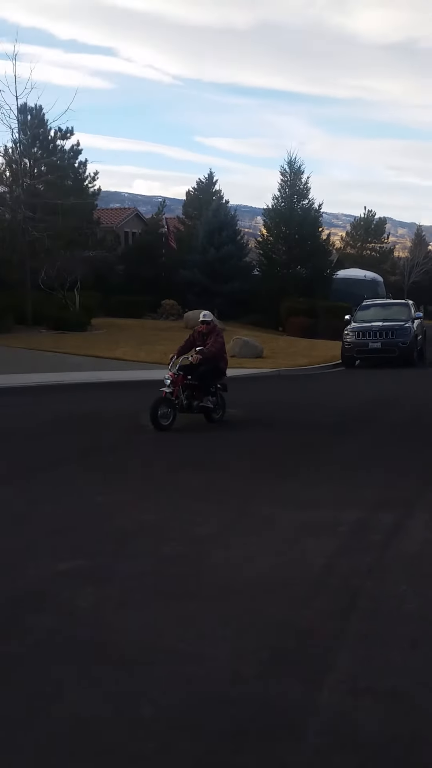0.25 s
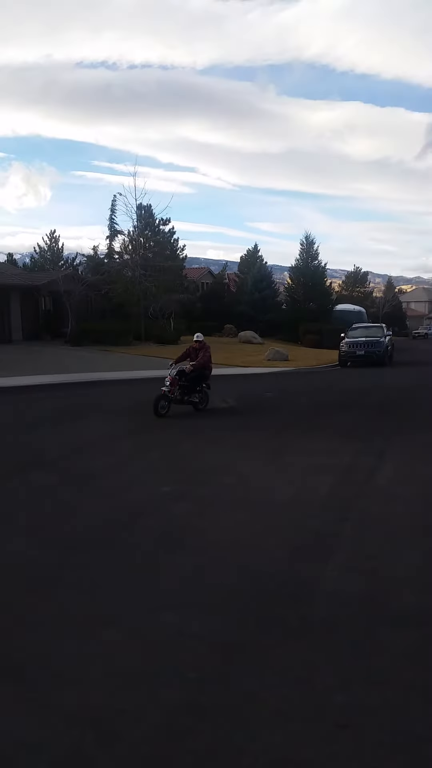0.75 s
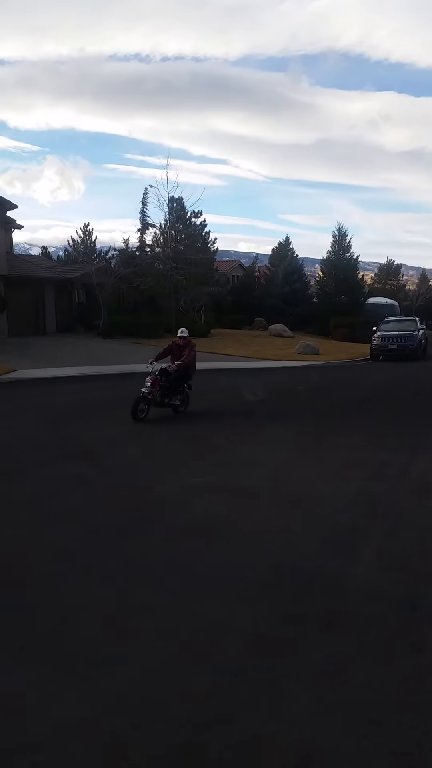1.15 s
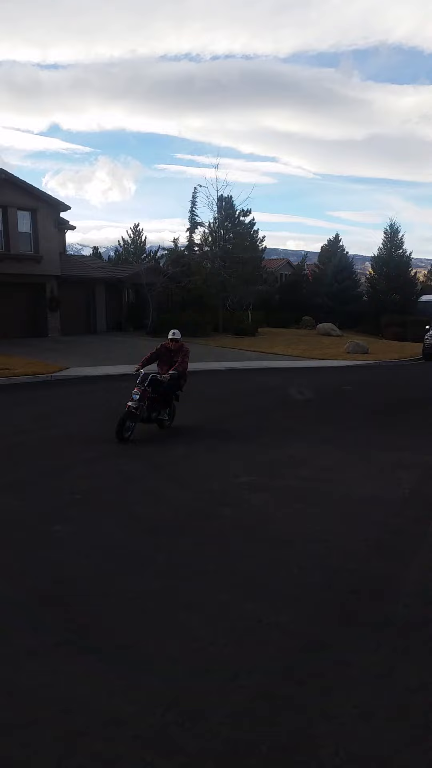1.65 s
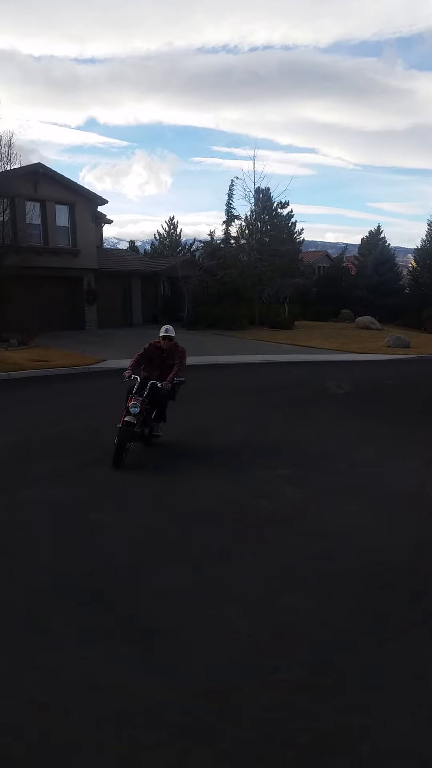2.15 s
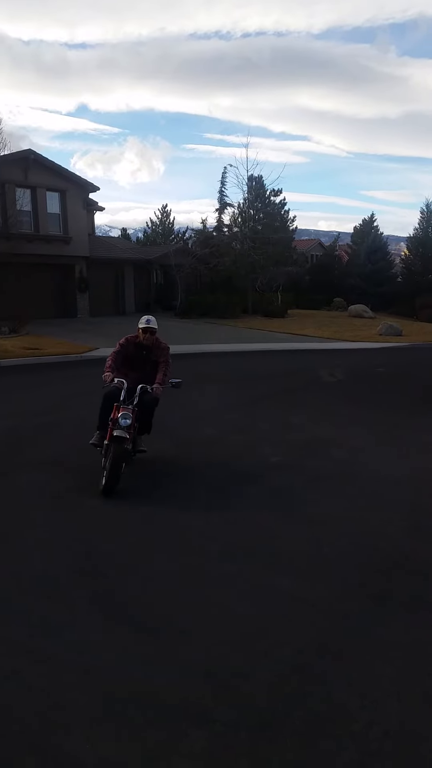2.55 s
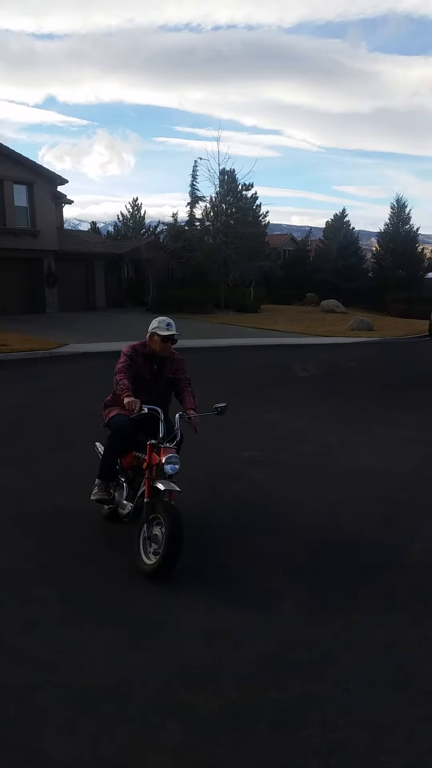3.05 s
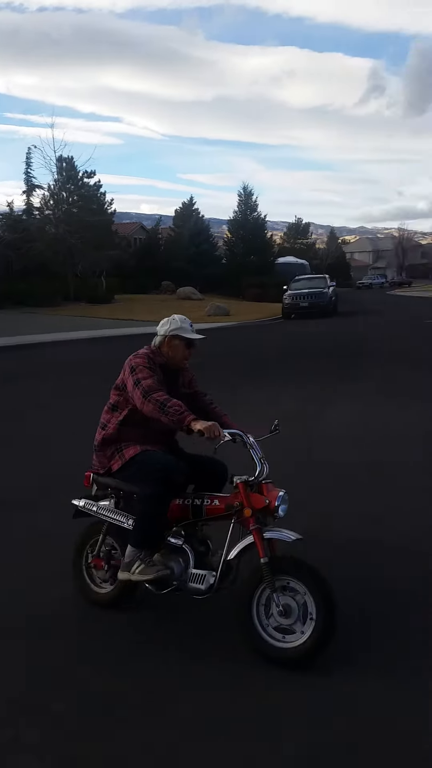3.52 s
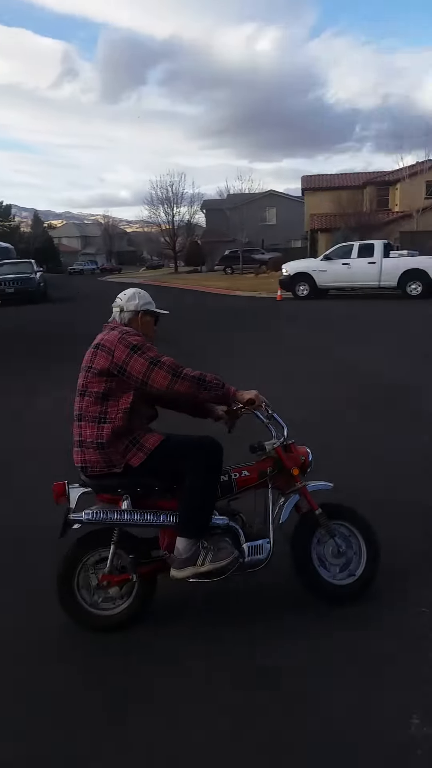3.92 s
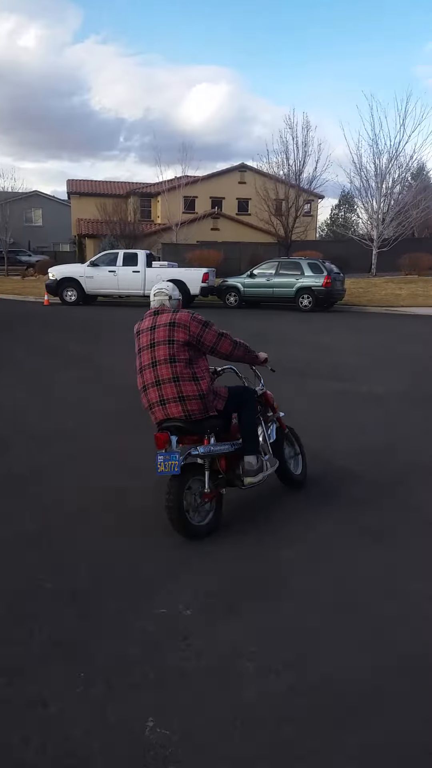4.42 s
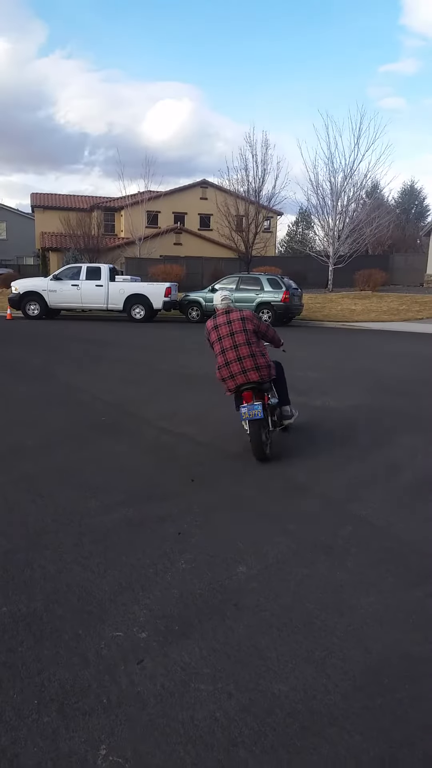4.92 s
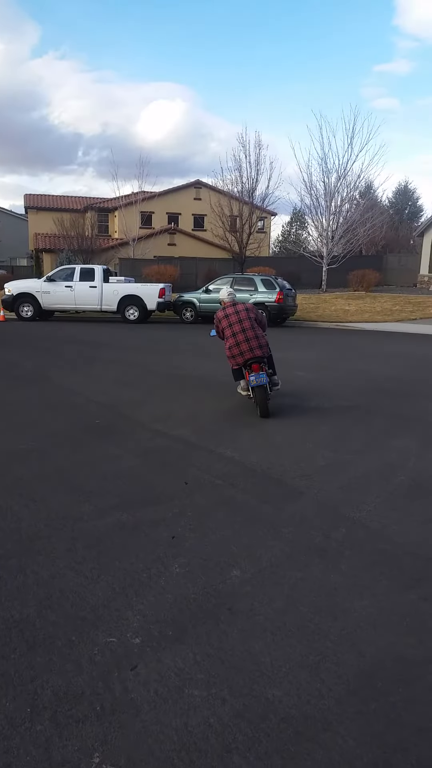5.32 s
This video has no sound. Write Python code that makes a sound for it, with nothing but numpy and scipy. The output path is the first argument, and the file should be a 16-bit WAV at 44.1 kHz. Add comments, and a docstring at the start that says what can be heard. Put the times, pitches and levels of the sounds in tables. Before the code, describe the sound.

A small four-stroke bike putters steadily at about twenty-five firings a second, nearly buried in wind blows at first. It grows with intake honk, valve clatter and gear whine, passes close, briefly eases off, then leaves raspier and slightly higher. The wind hits the left side hardest; the bike is duller on the right, with faint house echoes.

```python
"""Gusts flutter, slap and crack at both microphone ports; a four-stroke minibike putters through them.
On a quiet street the single-cylinder bike rounds a bend, passes close to the microphone and rides away.
Clicks from one crank ring the cavities of exhaust and intake and the casing; gears whine as a band of noise.
Coming, intake, gears and valves stand out; going, the silencer points back and spits with every firing.
The wind is coloured noise under gust envelopes, and the bike sounds muffled at the right port."""
import sys
import numpy as np
from scipy import signal
from scipy.fft import rfft, irfft, next_fast_len
from scipy.io import wavfile
from scipy.ndimage import uniform_filter1d, map_coordinates

SR = 44100
rng = np.random.default_rng(int(sys.argv[2]) if len(sys.argv) > 2 else 0)


def unload_audio(sound):
    """Save the sound as a 16-bit wav file, at the path given as the first command line argument."""
    columns = np.transpose(np.atleast_2d(sound))
    # keep every value between -1 and 1, then stretch to whole-number steps
    steps = np.round(np.clip(columns, -1, 1) * 32767)
    wavfile.write(sys.argv[1], SR, steps.astype(np.int16))


N = 245975   # samples


def from_db(db):
    """Decibels to gain."""
    return 10 ** (np.asarray(db) / 20)


def rms_one(x):
    """Scale to rms 1."""
    return x / np.sqrt(np.mean(x ** 2) + 1e-20)


def evened(x):
    """Hold each channel near rms 1 over a tenth of a second; quicker lumps stay."""
    return x / np.sqrt(uniform_filter1d(x ** 2, SR // 10, axis=1) + 1e-12)


def in_time(rows):
    """Each column of a curve table, at every sample."""
    s, *columns = np.transpose(rows)
    return [np.interp(np.arange(N) / SR, s, column) for column in columns]


def coloured(x, points):
    """Filter by a spectrum table, straight lines in dB over log frequency."""
    size = next_fast_len(N + 4096)
    hz, db = np.transpose(points)
    grid = np.maximum(np.fft.rfftfreq(size, 1 / SR), 1)
    gain = from_db(np.interp(np.log(grid), np.log(hz), db))
    return irfft(rfft(x, size) * gain, size)[..., :N]


def low_pass(x, hz, order=2):
    """Butterworth low-pass."""
    return signal.sosfilt(signal.butter(order, min(hz, .45 * SR), fs=SR, output="sos"), x + 1e-18)


def drift(per_s):
    """Smooth chance of spread 1, with a new random value per_s times a second."""
    steps = np.arange(N) / SR * per_s
    return rms_one(map_coordinates(rng.standard_normal(16384), [steps], order=2, mode="wrap"))


def port_noise(alike):
    """White noise at the two ports, partly shared."""
    shared, alike = rng.standard_normal(N), np.clip(alike, 0, 1)
    return np.sqrt(alike) * shared + np.sqrt(1 - alike) * rng.standard_normal((2, N))


def resonate(x, modes, order=1):
    """Parallel resonances of alternating sign; order 2 steepens their skirts."""
    out = 0
    for k, (hz, width_hz, db) in enumerate(modes):
        radius = np.exp(-np.pi * width_hz / SR)
        feed = np.array([1, 0, -1]) * (1 - radius * radius) / 2
        back = [1, -2 * radius * np.cos(2 * np.pi * hz / SR), radius * radius]
        ring = x + 1e-18
        for _ in range(order):
            ring = signal.lfilter(feed, back, ring)
        out = out + (-1) ** k * from_db(db) * ring
    return out


def strokes(cycle, share, spread_db, delay_s=0, jitter_s=0):
    """One click, uneven in strength and timing, whenever the engine passes this share of its cycle."""
    at = np.flatnonzero(np.diff(np.floor(cycle - share)))
    force, slip = np.clip(rng.standard_normal((256, 2)), -1.8, 1.8)[:len(at)].T
    shifted = at + ((delay_s + jitter_s * slip) * SR).astype(int)
    clicks = np.zeros(N)
    clicks[np.clip(shifted, 0, N - 1)] = from_db(spread_db * force)
    return clicks


def puffs(clicks, rise_s, decay_s):
    """Every click becomes an envelope that swells to a peak as high as the click and dies away."""
    t = np.arange(SR // 10) / SR
    shape = (1 - np.exp(-(t / rise_s) ** 2)) * np.exp(-t / decay_s)
    return signal.fftconvolve(clicks, shape / shape.max())[:N]


def thump(clicks, modes):
    """Pressure pulses ring a cavity for a few swings; a unit pulse peaks at 1."""
    unit = resonate(signal.unit_impulse(SR // 10), modes, order=2)
    return resonate(clicks, modes, order=2) / np.abs(unit).max()


# Light air between the gusts, with one lull. Each row: time in seconds, relative rumble level in dB.
BREEZE = [(0, -24.5), (.75, -28), (.95, -32), (1.15, -43), (1.4, -26), (2.35, -31.5), (2.62, -24.5),
          (4.5, -28), (5.58, -27.5)]
BREEZE_RIGHT_DB, BREEZE_FLUTTER_DB = -1.5, -10   # against the left port's rumble
BREEZE_SWING_DB, BREEZE_SWINGS_PER_S = 3, 15
# Gusts over the microphone. Each row: time of the height in seconds, length in seconds, then relative
# levels in dB of left rumble, right rumble and left flutter.
GUSTS = [(0.142, 0.13, -14.5, -57, -20.5), (0.26, 0.1, -17, -17, -26), (0.478, 0.14, -18.5, -15, -16.5),
         (0.707, 0.054, -22, -32.5, -26.5), (0.861, 0.026, -25, -44, -23.5), (1.325, 0.18, -43, -22, -40),
         (1.537, 0.17, -27.5, -26.5, -15), (2.19, 0.057, -27, -30, -41), (2.607, 0.12, -17, -15.5, -31.5),
         (2.72, 0.034, -14.5, -16, -19.5), (2.766, 0.026, -19, -21, -13.5), (3.316, 0.059, -12, -29, -18.5),
         (3.517, 0.13, -16.5, -12.5, -21), (3.773, 0.081, -25, -12, -23.5), (4.015, 0.016, -12, -39, -25),
         (4.049, 0.025, -24, -34, -13.5), (4.17, 0.052, -16, -28, -15), (4.276, 0.045, -16.5, -41, -9),
         (4.618, 0.11, -37, -49, -15), (4.856, 0.17, -17, -47, -17), (5.058, 0.067, -20, -18.5, -21.5),
         (5.546, 0.37, -22.5, -21, -48)]
GUST_EDGE_DB = 3   # a gust is this far below its height at half its length either side


def airflow():
    """Left rumble, right rumble and left flutter in dB: bell-shaped gusts add their power to a wavering breeze."""
    t, (breeze_db,) = np.arange(N) / SR, in_time(BREEZE)
    left_db, right_db = (breeze_db + BREEZE_SWING_DB * drift(BREEZE_SWINGS_PER_S) for _ in range(2))
    power = from_db([left_db, right_db + BREEZE_RIGHT_DB, left_db + BREEZE_FLUTTER_DB]) ** 2
    for s, length_s, *height_db in GUSTS:
        near = np.abs(t - s) < 2 * length_s
        swell = from_db(-GUST_EDGE_DB * (2 * (t[near] - s) / length_s) ** 2)
        power[:, near] += np.outer(from_db(height_db), swell) ** 2
    return 10 * np.log10(power)


# Wind spectra at a port; flutter also colours the buffets. Each row: frequency in Hz, relative level in dB.
RUMBLE = [(12, -22.5), (28, -2), (55, 5.5), (110, 7.5), (180, 2), (260, -5), (400, -16), (900, -84.5)]
FLUTTER = [(130, -15), (290, 9.5), (450, 3), (700, -4.5), (1000, -17.5), (1600, -31), (3000, -84)]
CRACKLE = [(400, 10), (1200, 4.5), (2500, -14.5), (4500, -32), (6500, -33), (9000, -47)]


def wind(left_db, right_db, flutter_db):
    """Lumpy rumble, separate at each port; harder flow breaks into flutter, the hardest into crackle."""
    rumble = evened(coloured(rng.standard_normal((2, N)), RUMBLE))
    lumps_db = 5.66 * np.array([drift(160) for _ in range(2)])
    eddies = rng.standard_normal((2, N)) * from_db(lumps_db)
    flutter, crackle = evened(coloured(eddies, FLUTTER)), evened(coloured(eddies, CRACKLE))
    rumble_db = np.array([left_db, right_db])
    both_db = np.array([flutter_db, 1.115 * right_db - 10.5])   # the right flutter follows its rumble
    crackle_db = both_db - 32.0 + np.minimum(both_db - rumble_db, 8)
    return rumble * from_db(rumble_db + 4.0) + flutter * from_db(both_db - 3.0) + crackle * from_db(crackle_db)


# Eddies that slap the ports. Each row: time in seconds (the swing crosses zero 4 ms later), relative
# level in dB over both ports, left minus right in dB, half swing in seconds.
BUFFETS = [(0.088, -7.5, 29, 0.00047), (0.281, 0.5, 34, 0.00073), (0.383, -0.5, 22, 0.0013),
           (0.484, -1.5, 34, 0.00085), (0.538, -2, 33, 0.0016), (0.642, -3, 16.5, 0.0017),
           (0.856, -16.5, 39, 0.0004), (1.152, -9, -21, 0.00134), (1.853, -11.5, 10, 0.0023),
           (2.158, -13, 21, 0.0016), (2.646, -6, 19, 0.001), (2.747, -8.5, 35, 0.00063),
           (2.773, -5.5, 34, 0.0011), (4.137, -6, 30, 0.00031), (4.235, -2.5, 30, 0.0014),
           (4.414, -3, 38, 0.00055), (4.797, -7, 43.5, 0.00025), (4.846, -1.5, 42, 0.00024),]


def buffets():
    """An eddy slaps a port: one big pressure swing and a short shudder."""
    out, t = np.zeros((2, N)), np.arange(-SR // 100, SR // 10) / SR
    age = np.maximum(t, 0)
    shape = (1 - np.exp(-(age / 0.0012) ** 2)) * np.exp(-age / 0.01)
    shudder = rms_one(coloured(rng.standard_normal(N), FLUTTER))
    for s, db, pan_db, swing_s in BUFFETS:
        start = int((s + t[0]) * SR)
        span, phase = slice(start, start + len(t)), (t - .004) / swing_s
        swing = phase * np.exp((1 - phase ** 2) / 2)
        burst = swing + 0.4 * shape * shudder[span]
        sides = from_db([[pan_db / 2], [-pan_db / 2]])
        out[:, span] += sides / np.linalg.norm(sides) * from_db(db) * burst
    return out


# The flow tears at the left port with a crack. Each row: time of the height in seconds,
# relative level in dB there, half length in seconds.
CRACKS = [(0.292, -27, 0.0046), (0.391, -27, 0.0045), (0.4927, -15, 0.00069), (0.4979, 1.5, 0.00082),
          (0.506, -19, 0.0012), (0.5092, -11, .0008), (0.5113, -13.5, 0.0015), (.525, -7.5, 0.0014),
          (0.5428, -16, 0.0013), (0.547, -18, 0.0027), (0.552, -24.5, 0.0012), (0.646, -24, 0.003),
          (1.487, -12, 0.0025), (1.497, -9.5, 0.0014), (1.5053, -14.5, 0.0021), (1.519, -16, 0.0023),
          (1.543, -26, 0.013), (1.597, -23, 0.016), (4.183, -15, 0.0025), (4.266, -12, .004),
          (4.32, -21, 0.0027), (4.847, -12.5, 0.0052)]
# Spectrum of the tearing air. Each row: frequency in Hz, relative level in dB.
CRACK_TONE = [(200, -6), (500, 7.5), (1200, 2.5), (2500, -12), (4500, -26.5), (6500, -25.5), (8200, -49),
              (15000, -56)]
CRACK_TAIL_DB, CRACK_TAIL_S = -16, 0.0064
# Treble limit: this many cycles per half length but never below the floor, so the shortest are brightest.
CRACK_DULLEST_HZ, CRACK_CYCLES = 1400, 5.1
GRAINS_PER_S = 1500   # fast air breaks into eddies, here and in the exhaust


def cracks():
    """The hardest eddies tear in clusters of short bursts with quick tails, almost all at the left port."""
    out, t = np.zeros(N), np.arange(N) / SR
    crackle = coloured(rng.standard_normal(N) * from_db(5.9 * drift(GRAINS_PER_S)), CRACK_TONE)
    for s, db, half_s in CRACKS:
        near = np.abs(t - s) < .03
        age = t[near] - s
        tail = (age > 0) * from_db(CRACK_TAIL_DB) * np.exp(-np.abs(age) / CRACK_TAIL_S)
        shape = np.maximum(np.exp(-(age / half_s) ** 2), tail)
        burst = low_pass(shape * crackle[near], max(CRACK_DULLEST_HZ, CRACK_CYCLES / half_s))
        out[near] += from_db(db) * burst * np.linalg.norm(shape) / np.linalg.norm(burst)
    return out * from_db([[0], [-36]])


def ports(gusts):
    """The hardest gusts saturate at the ports, and carry only a trace of high treble."""
    pressed = .85 * np.tanh(gusts / .85)
    return low_pass(pressed, 7000, order=8) + from_db(-27) * pressed


# Echo from the house fronts. Each row: delay in seconds, level in dB.
ECHOES = [(.058, -16)]


def street(x):
    """Dull echoes from the house fronts."""
    dull = low_pass(x, 2500)
    return sum(from_db(db) * np.pad(dull, ((0, 0), (int(s * SR), 0)))[:, :N] for s, db in ECHOES)


# Pitch of the gears, highest as the bike gathers speed. Each row: time in seconds, frequency in Hz.
WHINE = [(1.7, 1741), (2.45, 1640), (3.3, 1701), (4.05, 1705), (4.45, 1877), (5.58, 1984)]
# Offset against the clatter level, share of the clatter's swing, filter cutoff of the roughness.
WHINE_DB, WHINE_FOLLOWS, WHINE_WIDTH_HZ = -7.5, 0.99, 116


def gears(cycle, near_db):
    """Meshing teeth give a rough whine that throbs with each power stroke."""
    mesh = np.exp(2j * np.pi * np.cumsum(in_time(WHINE)[0]) / SR)
    rough = low_pass(port_noise(alike=0.94) + 1j * port_noise(alike=0.69), WHINE_WIDTH_HZ)
    throb = 1 + 0.23 * np.cos(2 * np.pi * cycle)
    return from_db(WHINE_DB + WHINE_FOLLOWS * near_db) * rms_one((mesh * rough).real * throb)


# Valve and piston knocks. Each row: share of the cycle, relative level in dB.
KNOCKS = [(0.127, 2), (0.289, -10), (.47, -9.5), (0.953, 0.5)]
KNOCK_SPREAD_DB, KNOCK_JITTER_S = 4, 0.0006
# The casing's resonances. Each row: frequency in Hz, width in Hz, level in dB.
CASING = [(850, 580, 1), (1677, 176, 6.5), (4130, 220, -17), (5510, 160, -9.5)]
# Spectrum of the clatter. Each row: frequency in Hz, relative level in dB.
CLATTER = [(120, -14.5), (300, 2.5), (600, -4), (1100, -0.5), (2000, -1), (3100, -4.5), (6800, -1),
           (8000, -5), (9800, -28), (12000, -17.5), (15500, -30)]


def mechanics(cycle, level_db):
    """Valve gear and piston knock on the casing over the steady rustle of chain and tyres."""
    knocks = sum(from_db(db) * strokes(cycle, share, KNOCK_SPREAD_DB, jitter_s=KNOCK_JITTER_S)
                 for share, db in KNOCKS)
    knocks = knocks * from_db(np.minimum(level_db + 40.0, 0))   # from afar they blur into the rustle
    taps = puffs(knocks, rise_s=.0006, decay_s=.002)
    rustle = 0.83 * from_db(2.77 * drift(300))
    shake = port_noise(alike=0.58) * (rustle + taps)
    blows = from_db(14.0) * low_pass(knocks, 1500)
    sound = low_pass(resonate(shake + blows, CASING), 7900, order=6) + coloured(shake, CLATTER)
    # the highest treble only carries from close by
    far = low_pass(sound, 6890, order=12)
    top = signal.sosfilt(signal.butter(6, 8500, "high", fs=SR, output="sos"), sound)
    top_gain = from_db(np.minimum(1.4 * (level_db + 36.5), 0))
    return from_db(level_db + 6.5) * (far + top * top_gain)


# Resonances of the airbox and the intake's mouth. Each row: frequency in Hz, width in Hz, relative level in dB.
AIRBOX = [(154, 105, 15.5), (443.6, 135, 3.5), (200, 38, 0.5)]
INTAKE_MOUTH = [(422.4, 191, 13), (616, 122, 4), (788, 134, 3.5), (956, 130, -8)]


def intake(cycle, thump_db, honk_db):
    """The piston gulps air just after the exhaust stroke: the airbox booms; from close by its mouth honks unevenly."""
    gulps = strokes(cycle, 0, spread_db=1.8, delay_s=0.002262)
    honks = strokes(cycle, 0, spread_db=2.5, delay_s=0.002234, jitter_s=0.00027)
    return from_db(thump_db) * thump(gulps, AIRBOX) + from_db(honk_db) * thump(honks, INTAKE_MOUTH)


# The rider eases off before the turn and at its tightest, then pulls away; engine_levels() uses it too.
# Each row: time in seconds, throttle from 0 to 1.
THROTTLE = [(0, 0.55), (1.6, 0.86), (2.7, 0.99), (3.15, 0.75), (3.6, 0.78), (4.0, 0.13), (4.5, 0.66),
            (4.9, 1), (5.58, 1)]
# The silencer's resonances. Each row: frequency in Hz with throttle shut, width in Hz, level in dB,
# Hz added by full throttle.
SILENCER = [(480, 880, -5, 1.5), (1110, 70, 7, 29), (1700, 680, -4.5, -1.5), (2625, 92, 6, -1),
            (3850, 212, 5, 301), (5505, 240, 4, -0.5), (6213, 170, 7, 239)]
# Random spread from burn to burn: of the silencer's pitches (share) and of their strengths.
BURN_DETUNE, BURN_COLOUR_DB = .018, 2.8


def silencer(flow, blows):
    """Each burn differs in heat and force, so each spit rings with a tone of its own; throttle shifts its pitches."""
    out, length, (throttle,) = np.zeros((2, N + SR)), SR // 10, in_time(THROTTLE)
    starts = np.flatnonzero(blows)
    for start, end in zip(starts, np.append(starts[1:], N)):
        modes = []
        for hz, width_hz, db, rise_hz in SILENCER:
            pitch = (hz + rise_hz * throttle[start]) * (1 + BURN_DETUNE * rng.standard_normal())
            modes.append((pitch, width_hz, db + BURN_COLOUR_DB * rng.standard_normal()))
        spit = np.pad(flow[:, start:end], ((0, 0), (0, length - (end - start))))
        out[:, start:start + length] += resonate(spit, modes)
    return low_pass(out[:, :N], 7250, order=6)


# Resonances of the exhaust pipe. Each row: frequency in Hz, width in Hz, relative level in dB.
PIPE = [(183.3, 108, 5), (420, 124, -9)]
# Spectra of the open jet and of its hiss from close by. Each row: frequency in Hz, relative level in dB.
JET = [(200, -31), (500, -10.5), (1000, -25.5), (3200, -15.5), (5000, -9.5), (7200, -8.5), (8200, -20),
       (9800, -43)]
HISS = [(9800, -35.5), (12000, -22), (15500, -26)]
SPIT_RISE_S, SPIT_DECAY_S, SPIT_GRAIN_DB = 0.0019, 0.002, 1.5


def exhaust(cycle, thump_db, spit_db, near_db):
    """The valve opens: a low thump from the pipe, then a sharp front and a turbulent spit, hissing from close by."""
    low = thump(strokes(cycle, 0, spread_db=4.0, delay_s=-0.0022), PIPE)
    blows = strokes(cycle, 0, spread_db=0.43, delay_s=-0.0021)
    blast = puffs(blows, SPIT_RISE_S, SPIT_DECAY_S)
    outflow = 0.12 * puffs(blows, rise_s=0.008, decay_s=0.016)   # the piston pushes out the rest
    grain = rms_one(from_db(SPIT_GRAIN_DB * drift(GRAINS_PER_S)))
    jet = port_noise(alike=0.37) * (blast + outflow) * grain
    front = from_db(12.0) * low_pass(blows, 920)   # one shape in every cycle, so it gives clean harmonics
    hiss = coloured(jet, HISS) * from_db(0.94 * (near_db + 42.0))
    spit = silencer(jet + front, blows) + coloured(jet, JET) + hiss
    return from_db(thump_db) * low + from_db(spit_db + 10.0) * spit


# The bike swings wide, comes close and leaves. Each row: time in seconds, relative clatter level in dB.
PASS = [(0, -44), (.42, -54), (.56, -59), (1.25, -59), (2.05, -49), (2.85, -43), (3.25, -37.5), (3.95, -33),
        (4.5, -36.5), (4.85, -45), (5.58, -45.5)]
# How squarely the silencer faces the microphone. Each row: time in seconds, aim from 0 hidden to 1 straight on.
AIM = [(0, 0.15), (2.3, 0.098), (2.8, 0.41), (3.15, 0.69), (4.1, 0.61), (4.6, 0.83), (5.15, 0.95),
       (5.58, 0.94)]
# Each sound against the clatter: dB with throttle shut and silencer hidden, dB added by full throttle,
# dB added by full aim.
EXHAUST_LAW = (4.8, 18.4, 6.4)
SPIT_LAW = (-13, 0.56, 31.13)
INTAKE_LAW = (14, 14.1, 0)
# The rider comes to screen the intake; the change is centred after the end, so only its onset sounds.
PASSING_S, TURN_S, RIDER_SHADOW_DB = 5.82, 0.26, 8
HONK_DB, HONK_FOLLOWS, HONK_SHADOW_DB = 23, 1, 7   # against the clatter, share of its swing, full screening


def engine_levels():
    """Exhaust thump, spit, intake thump, honk and clatter in dB follow the pass; throttle and aim shape the thumps and spit."""
    (clatter_db,), (aim,), (throttle,) = in_time(PASS), in_time(AIM), in_time(THROTTLE)
    exhaust_db, spit_db, intake_db = (clatter_db + idle_db + throttle_db * throttle + aim_db * aim
                                      for idle_db, throttle_db, aim_db in (EXHAUST_LAW, SPIT_LAW, INTAKE_LAW))
    past = .5 + .5 * np.tanh((np.arange(N) / SR - PASSING_S) / TURN_S)
    honk_db = HONK_DB + HONK_FOLLOWS * clatter_db - HONK_SHADOW_DB * past
    return exhaust_db, spit_db, intake_db - RIDER_SHADOW_DB * past, honk_db, clatter_db


# Engine speed. Each row: time in seconds, firings per second.
SPEED = [(0.0, 25.257), (1.0, 25.354), (1.8, 25.661), (2.2, 24.987), (2.6, 24.547), (3.0, 24.955),
         (3.3, 24.97), (3.6, 25.62), (3.9, 25.761), (4.2, 25.399), (4.5, 26.679), (4.8, 27.462),
         (5.1, 28.254), (5.35, 29.09), (5.58, 29.948)]
# The bike reaches the two ports at slightly different times. Each row: time in seconds, left later by seconds.
PORT_LAG = [(0, -.00006), (2.3, 0), (3.7, .00007), (5.3, 0)]
# How the right port colours the bike. Each row: frequency in Hz, gain in dB.
RIGHT_PORT = [(230, -2.5), (500, -8), (1000, -6), (1700, -7.5), (2600, -9), (4000, -14.5), (5300, -26),
              (6500, -29), (8000, -28.5), (10000, 3.5), (13000, -4.5), (15500, 10.5)]


def scene():
    """One crank drives exhaust, intake and valve gear; the wind plays on the ports."""
    cycle = np.cumsum(in_time(SPEED)[0]) / SR + 0.0011 * drift(12)   # one cycle per firing, slightly unsteady
    exhaust_db, spit_db, intake_db, honk_db, clatter_db = engine_levels()
    bike = (exhaust(cycle, exhaust_db, spit_db, clatter_db) + intake(cycle, intake_db, honk_db)
            + mechanics(cycle, clatter_db) + gears(cycle, clatter_db))
    left, right = bike + street(bike)
    right = map_coordinates(right, [np.arange(N) + in_time(PORT_LAG)[0] * SR], order=5)
    gusts = wind(*airflow()) + buffets() + cracks()
    return np.array([left, coloured(right, RIGHT_PORT)]) + ports(gusts)


CUTOFF_HZ = 15800


def record(dry):
    """A steep elliptic low-pass cuts the top."""
    return signal.sosfilt(signal.ellip(10, .1, 90, CUTOFF_HZ, fs=SR, output="sos"), dry)


dry = scene()
out = record(dry)
unload_audio(out)
```